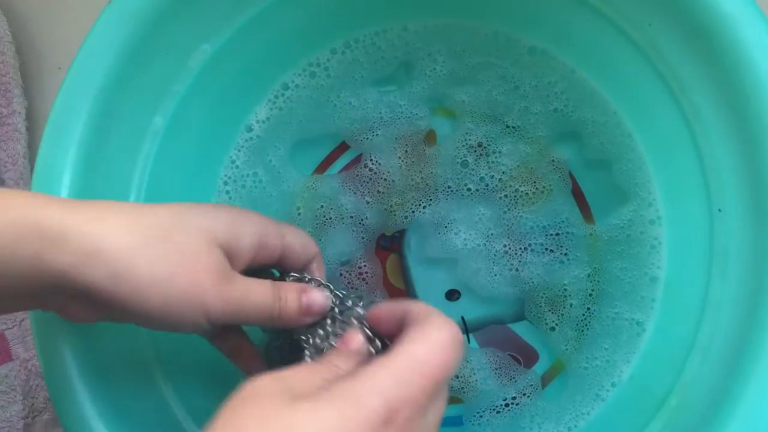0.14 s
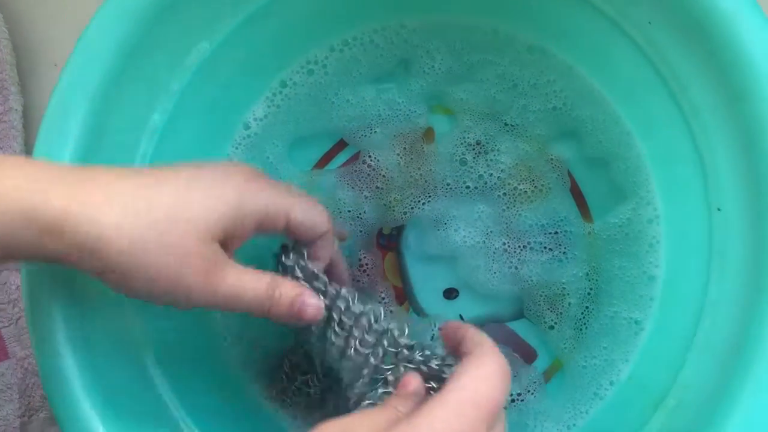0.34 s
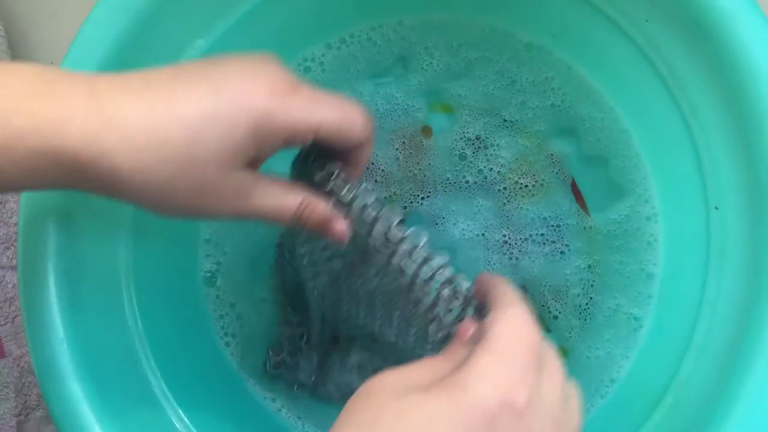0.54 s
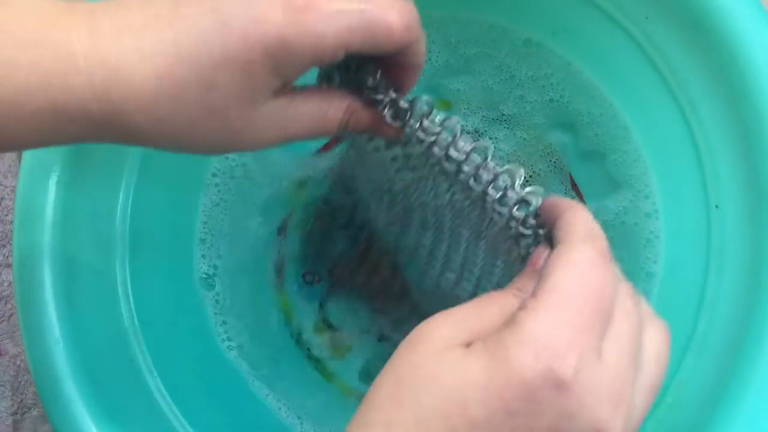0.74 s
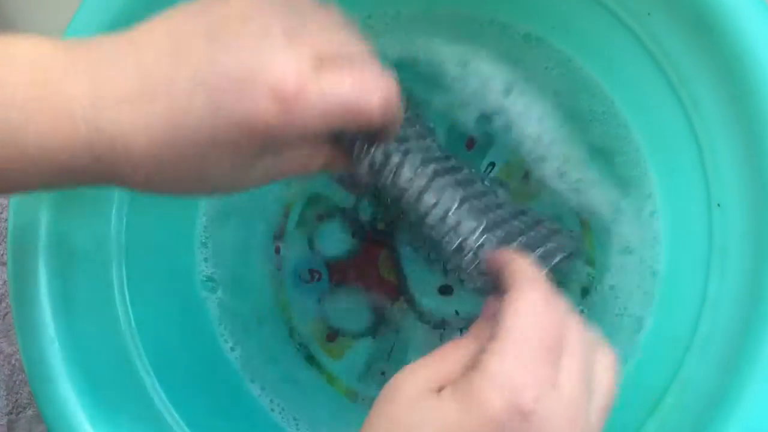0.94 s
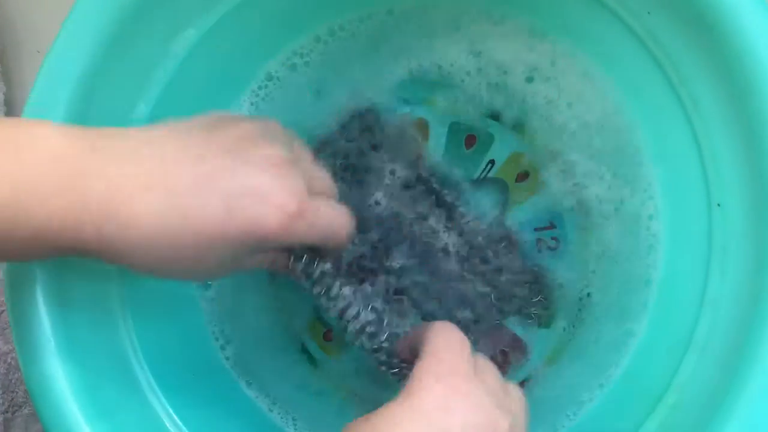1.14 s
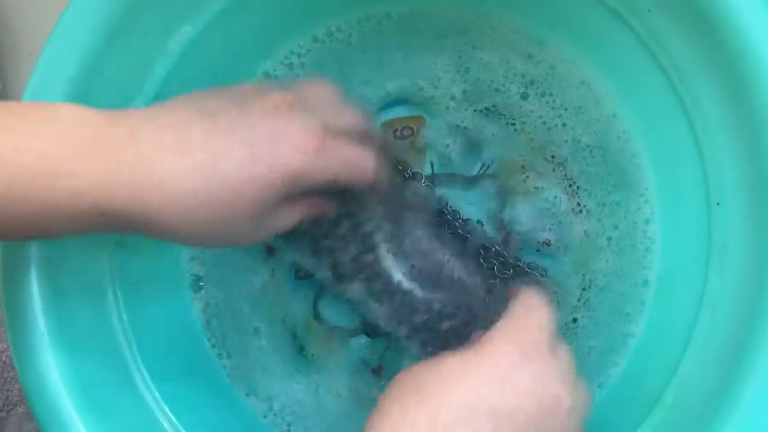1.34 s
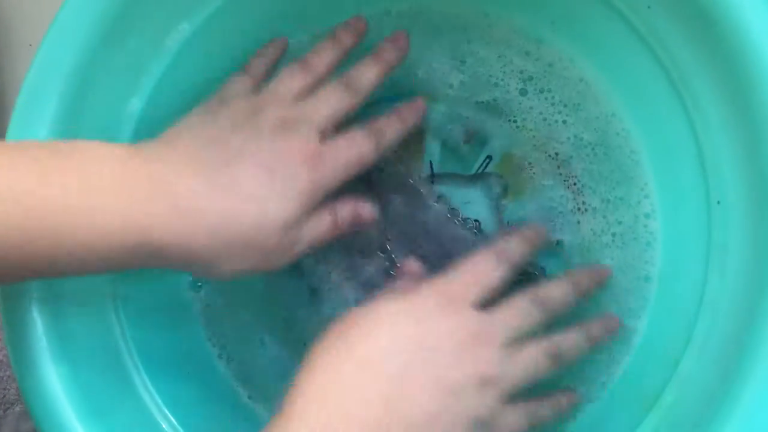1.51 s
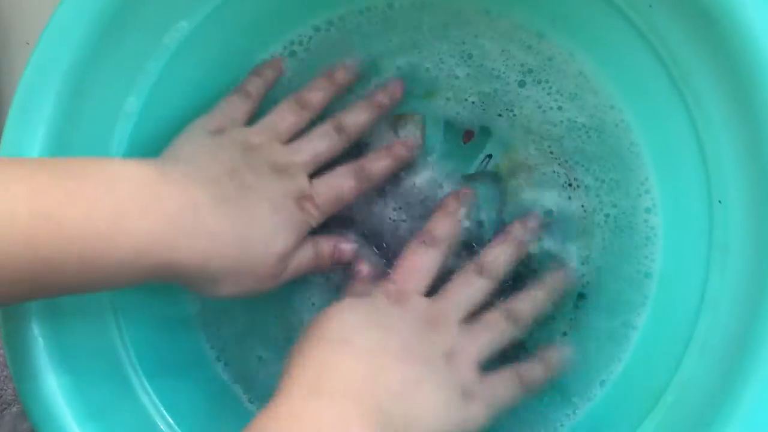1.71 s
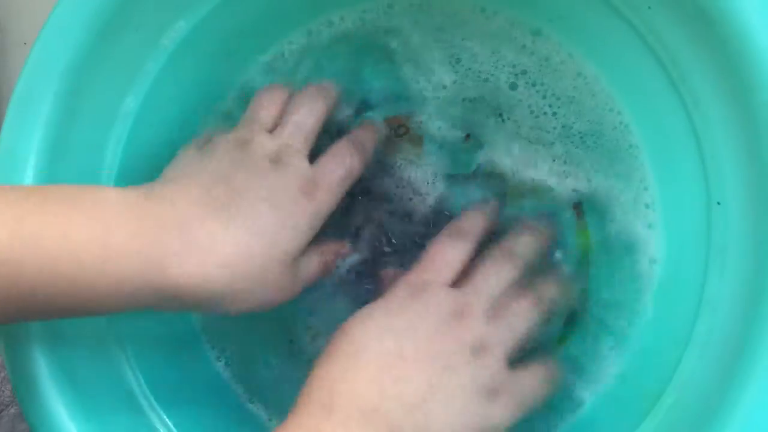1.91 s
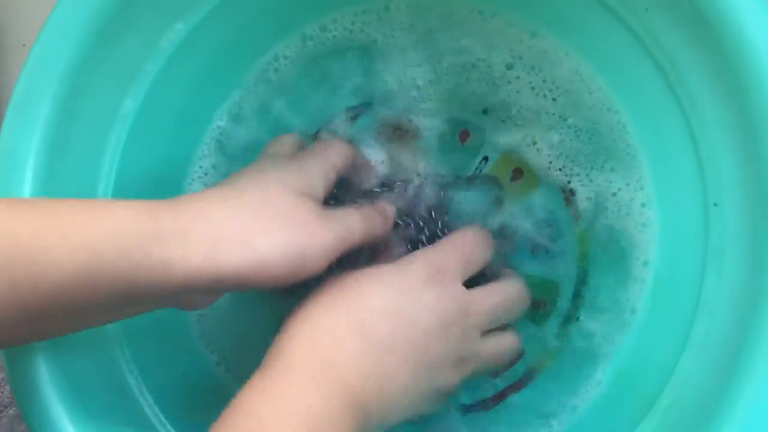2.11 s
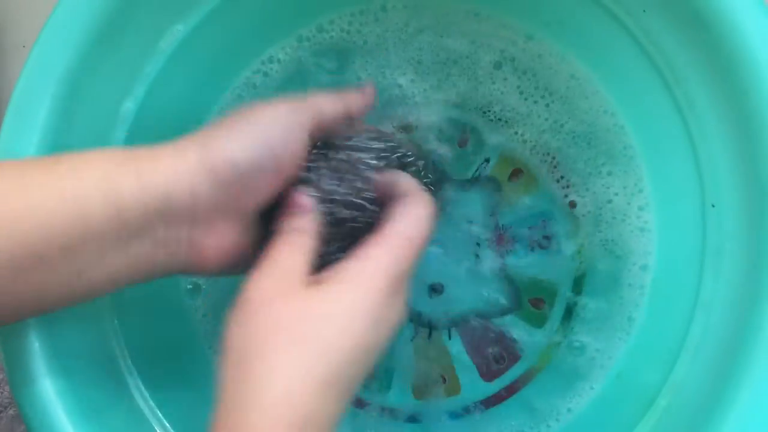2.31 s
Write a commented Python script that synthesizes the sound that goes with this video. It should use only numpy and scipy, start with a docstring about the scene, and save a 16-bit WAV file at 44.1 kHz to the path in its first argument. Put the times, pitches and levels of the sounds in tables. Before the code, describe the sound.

A sheet of chainmail drops with a clattering crash into a plastic basin and is rubbed in soapy water

```python
"""Chainmail in a washing-up basin

A sheet of chainmail jingles, drops into a plastic basin of soapy water and is rubbed by two hands.
Random contacts and short knocks drive the basin wall; brighter contacts are rings ticking on rings.
Decaying sines chime; filtered noise makes the slosh, the rumble on the floor and the hiss.
A small room adds a short tail; the sheet jingles again when lifted out."""
import sys
import numpy as np
from scipy import signal
from scipy.fft import rfft, irfft
from scipy.io import wavfile

SR = 44100
rng = np.random.default_rng(int(sys.argv[2]) if len(sys.argv) > 2 else 0)


def gain_from_decibels(decibels):
    """Convert decibel values to linear amplitude factors."""
    exponent = np.asarray(decibels, float) / 20
    return 10 ** exponent


def to_wav(sig):
    """Store sig (one row per channel, or 1-D mono) as 16-bit WAV at the path in sys.argv[1].

    Samples outside -1..1 are clipped; the rate is SR.
    """
    pcm = np.clip(np.atleast_2d(sig), -1, 1) * 32767
    pcm = np.round(pcm).astype(np.int16)
    wavfile.write(sys.argv[1], SR, pcm.T)  # frames by channels


N = 103635


def evened(x):
    """Scales to rms 1."""
    return x / np.sqrt(np.mean(x ** 2) + 1e-20)


def read(points, hz):
    """Interpolates (frequency, value) points on a log frequency axis."""
    f, value = np.transpose(points)
    return np.interp(np.log(hz + 1), np.log(f + 1), value)


def level(curve):
    """Gain over time from (s, dB) points; -120 dB before the first."""
    s, db = np.transpose(curve)
    return gain_from_decibels(np.interp(np.arange(N) / SR, s, db, left=-120))


def hiss(spectrum):
    """Steady noise of rms 1 with a spectrum."""
    hz = np.fft.rfftfreq(N, 1 / SR)
    shaped = rfft(rng.standard_normal(N)) * gain_from_decibels(read(spectrum, hz))
    return evened(irfft(shaped, N))


def clicks(per_s, spread_db):
    """Random contacts of either sign, a few of them large; rms 1 overall."""
    hit = rng.random(N) < per_s / SR
    size = gain_from_decibels(spread_db * np.minimum(rng.exponential(1, N), 4))
    sign = rng.choice([-1., 1.], N)
    return evened(hit * sign * size)


def body(spectrum, modes, modes_db, size=8192):
    """Minimum-phase response of unit energy to one blow: a broad colour with modes standing on it."""
    hz = abs(np.fft.fftfreq(size, 1 / SR))
    power = gain_from_decibels(np.maximum(read(spectrum, hz), -100)) ** 2
    for f, db, t60 in modes:
        detune = (hz - f) * t60 / 1.1  # in half bandwidths
        power += gain_from_decibels(db + modes_db) ** 2 / (1 + detune ** 2) ** 2
    log_gain = np.log(power) / 2
    phase = -signal.hilbert(log_gain).imag
    h = np.fft.ifft(np.exp(log_gain + 1j * phase)).real[:size // 2]
    return h / np.linalg.norm(h)


def air():
    """Room and microphone hiss: steady coloured noise."""
    # (frequency [Hz], relative level [dB])
    air_colour = [(15, -48), (25, -9), (248, -8.5), (316, -13), (557, -10.5), (691, -16), (2260, -12),
                  (7630, -26), (14600, -30), (15800, -21)]
    air_db = -70
    return gain_from_decibels(air_db) * hiss(air_colour)


def jingle():
    """Dry rings ticking, the sheet free in the air before the drop and when lifted out."""
    # sheet motion: (time [s], level [dB])
    jingle_curve = [(0, -76), (.05, -61.5), (.11, -58), (.14, -48.5), (.2, -54), (.23, -58), (.3, -83),
                    (2, -88), (2.15, -51), (2.27, -50.5), (2.35, -54)]
    # colour of dry rings: (frequency [Hz], relative level [dB])
    dry_colour = [(180, -71), (300, -54), (958, -35), (1270, -35), (2090, -19), (4480, -19), (6450, -19),
                  (7130, -20), (10300, -19.5), (11300, -11.5), (15800, -20)]
    # ring modes: (frequency [Hz], level before links_db [dB], nominal t60 [s])
    links = [(11450, 1, .008), (12000, -3, .006)]
    links_db = -6
    force = level(jingle_curve) * clicks(per_s=8000, spread_db=3.9)
    return signal.oaconvolve(force, body(dry_colour, links, links_db))[:N]


def rumble():
    """Basin rocking on the floor: low noise that rises and falls."""
    # rocking: (time [s], level [dB])
    rumble_curve = [(0.0, -81), (0.04, -74), (0.09, -78), (0.13, -69), (0.21, -82), (0.24, -62),
                    (0.26, -48.5), (0.49, -75.5), (0.67, -62.5), (0.72, -65), (1.0, -67), (1.2, -66),
                    (1.3, -65), (1.34, -72), (1.38, -64), (1.43, -75), (1.47, -51), (1.67, -82),
                    (1.71, -58.5), (1.79, -74), (1.86, -51), (1.96, -59.5), (1.98, -52), (2.02, -66),
                    (2.05, -52.5), (2.18, -52.5), (2.32, -71), (2.35, -76)]
    # colour: (frequency [Hz], relative level [dB])
    low_colour = [(15, -40), (40, -8), (65, 2.5), (95, 14.5), (115, 4.5), (140, 13), (170, -16), (230, -42),
                  (500, -90)]
    return level(rumble_curve) * hiss(low_colour)


def slosh():
    """Water pushed by the hands: noise with a watery colour that rises and falls."""
    # water motion: (time [s], level [dB])
    slosh_curve = [(0.0, -76), (0.2, -86), (0.24, -53.5), (0.43, -77), (0.76, -64.5), (0.82, -79),
                   (0.89, -64), (0.95, -67.5), (1.01, -63), (1.13, -77), (1.16, -56.5), (1.44, -73),
                   (1.48, -50.5), (1.53, -78), (1.65, -88), (1.73, -51), (1.79, -72), (1.86, -50.5),
                   (2.01, -68), (2.03, -57), (2.12, -49), (2.35, -66.5)]
    # colour: (frequency [Hz], relative level [dB])
    water_colour = [(110, -45), (170, -1.5), (220, -4.5), (280, -7), (400, -11), (600, -6.5), (1000, -30),
                    (2000, -70)]
    return level(slosh_curve) * hiss(water_colour)


def bump():
    """A soft bump on the floor: a low sine under a smooth window."""
    # (time [s], peak level [dB], pitch [Hz])
    thumps = [(0.109, -53.5, 69.5)]
    bump_s = 0.057
    out, t = np.zeros(N), np.arange(0, bump_s, 1 / SR)
    for s, db, hz in thumps:
        start = round(s * SR)
        out[start:start + len(t)] += gain_from_decibels(db) * np.hanning(len(t)) * np.sin(2 * np.pi * hz * t)
    return out


def chimes():
    """Single rings that chime: sines with a quick onset and exponential decay."""
    # (time [s], level [dB], pitch [Hz])
    chime_list = [(.160, -42, 11450), (.192, -42, 6300), (.204, -40, 5200), (.272, -25, 5250),
                  (.390, -33, 4450), (.408, -33, 4450), (.659, -30, 6180), (.740, -37, 6250)]
    t60_s, onset_s = 0.018, 0.0006
    out, t = np.zeros(N), np.arange(2500) / SR
    for s, db, hz in chime_list:
        start = round(s * SR)
        envelope = np.minimum(t / onset_s, 1) * gain_from_decibels(db - 60 * t / t60_s)
        out[start:start + len(t)] += envelope * np.sin(2 * np.pi * hz * t)
    return out


def knock_force(column):
    """Short clusters of rings meeting the wall: noise bursts at the level in one column."""
    # (time [s], wall level [dB], tick level [dB], cluster decay [s])
    knocks = [(0.217, -12, -30, 0.0064), (0.227, -8.5, -34, 0.005), (0.237, 3.5, -39, 0.0015),
              (0.237, -9, -36, 0.0028), (0.242, 4, -17, 0.0013), (0.246, -11.5, -23, 0.0037),
              (0.388, -25, -50, 0.0043), (0.409, -24, -47, 0.0023), (0.445, -26.5, -52, 0.0055),
              (0.463, -27, -47, 0.0043), (0.498, -22, -44, 0.0033), (0.547, -49, -42, 0.0059),
              (0.671, -36, -51, 0.0058), (0.748, -20, -42, 0.007), (0.792, -29, -34.5, 0.0033),
              (0.826, -26, -36.5, 0.0024), (0.84, -15, -37, 0.009), (0.856, -25, -31.5, 0.005),
              (0.92, -24, -43.5, 0.0096), (0.973, -14, -57, 0.0048), (1.01, -16, -46, 0.0016),
              (1.036, -11, -28, 0.0036), (1.161, -16, -46, 0.0074), (1.215, -28, -41.5, 0.007),
              (1.351, -32.5, -46, 0.0043), (1.364, -39, -41.5, 0.0056), (1.389, -25.5, -41, 0.0083),
              (1.42, -23, -41, 0.004), (1.442, -34, -36, 0.0032), (1.462, -20.5, -37, 0.006),
              (1.485, -12.5, -33, 0.0031), (1.492, -30, -30, 0.0038), (1.683, -27.5, -47, 0.004),
              (1.704, -14.5, -36, 0.0046), (1.711, -15.5, -43, 0.0017), (1.808, -41, -45, 0.0044),
              (1.843, -19, -34, 0.0038), (1.989, -24.5, -40, 0.002), (2.039, -20, -42, 0.0056),
              (2.113, -17.5, -40, 0.012)]
    force, t = np.zeros(N), np.arange(1024) / SR
    for row in knocks:
        start = round(row[0] * SR)
        burst = rng.standard_normal(len(t)) * np.exp(-(t / row[3]) ** 2)
        force[start:start + len(t)] += gain_from_decibels(row[column]) * burst
    return force


def ring_ticks():
    """Dense contacts of wet ring on ring, and those of the knocks, coloured by the rings."""
    # rings moving against each other: (time [s], level before rustle_db [dB])
    rustle_curve = [(0.2, -66), (0.21, -59), (0.214, -49), (0.242, -24), (0.342, -53), (0.438, -64),
                    (0.444, -51), (0.482, -63), (0.5, -47), (0.506, -53.5), (0.624, -52), (0.672, -46),
                    (0.688, -62), (0.714, -44.5), (0.852, -51.5), (0.858, -36), (0.886, -56), (0.91, -62),
                    (0.924, -44.5), (0.966, -46.5), (0.972, -32), (1.064, -43), (1.096, -50), (1.144, -54),
                    (1.164, -39), (1.208, -52.5), (1.214, -48), (1.25, -56), (1.26, -53), (1.284, -62),
                    (1.31, -78), (1.338, -91), (1.368, -52), (1.38, -62), (1.39, -42.5), (1.432, -51.5),
                    (1.466, -32), (1.502, -39), (1.512, -67), (1.59, -87), (1.674, -72), (1.682, -57),
                    (1.69, -43), (1.708, -38.5), (1.73, -44), (1.776, -66), (1.848, -39), (1.882, -35),
                    (1.918, -55), (1.946, -39.5), (1.982, -51), (1.988, -44), (1.996, -51.5), (2.042, -40),
                    (2.096, -39.5), (2.128, -42), (2.172, -33), (2.218, -49.5), (2.346, -30.5), (2.35, -50)]
    # colour of ring on ring: (frequency [Hz], relative level [dB])
    tick_colour = [(300, -25), (1500, -27.5), (2500, -5.5), (4000, -2), (6400, -6), (7200, -10.5),
                   (9800, -11.5), (10350, -18), (10800, -11), (11600, -13.5), (13000, -15.5), (15800, -17)]
    rustle_db = -0.5
    rustle = gain_from_decibels(rustle_db) * level(rustle_curve) * clicks(per_s=5200, spread_db=3.5)
    force = rustle + knock_force(column=2)
    return signal.oaconvolve(force, body(tick_colour, [], 0))[:N]


def basin():
    """A hail of small blows and some forty short knocks, from faint to hard, ring the wall modes."""
    # force of the rings on the basin: (time [s], level before scrape_db [dB])
    scrape_curve = [(0.2, -81), (0.204, -99), (0.214, -49), (0.238, -18.5), (0.284, -37), (0.296, -31.5),
                    (0.334, -42), (0.424, -48), (0.506, -44), (0.514, -44), (0.836, -33.5), (0.842, -33),
                    (0.884, -40), (1.006, -28.5), (1.012, -27.5), (1.076, -31), (1.096, -44),
                    (1.156, -38.5), (1.168, -48), (1.202, -37.5), (1.25, -41), (1.26, -38), (1.268, -38),
                    (1.344, -50), (1.384, -46.5), (1.396, -37), (1.414, -44), (1.422, -37), (1.438, -42.5),
                    (1.468, -29.5), (1.496, -30), (1.512, -51.5), (1.644, -62.5), (1.662, -86),
                    (1.688, -37.5), (1.706, -29), (1.72, -26), (1.754, -56), (1.806, -46.5), (1.848, -34),
                    (1.878, -28), (1.926, -48.5), (1.94, -33), (2.024, -41), (2.054, -29), (2.088, -36.5),
                    (2.17, -27.5), (2.204, -36.5), (2.27, -34), (2.282, -41.5), (2.35, -42)]
    # broad colour of one blow: (frequency [Hz], relative level [dB])
    thud_colour = [(150, -36), (260, -41), (350, -12.5), (540, -12.5), (740, -4.5), (1050, -6.5),
                   (1700, -2.5), (2100, -4), (2500, -9.5), (3400, -10), (4500, -17.5), (6500, -20.5),
                   (7500, -29), (15500, -34)]
    # wall modes: (frequency [Hz], level before modes_db [dB], nominal t60 [s])
    wall_modes = [(357, -17, .1), (748, -8, .05), (875, -9, .05), (1217, -6, .08), (1430, -9, .05),
                  (1601, 0, .055), (1717, 1, .055), (1960, 0, .045), (2100, -2, .05), (2200, -9, .05),
                  (2935, -12, .05), (3199, -8, .08), (3400, -11, .04), (3780, -13, .04)]
    scrape_db, knock_db, modes_db = -1.5, -10.5, 3
    knock_low_hz = 744  # knocks are light and stir little bass
    b, a = signal.butter(2, knock_low_hz, "high", fs=SR)
    light = signal.lfilter(b, a, knock_force(column=1))
    scrape = gain_from_decibels(scrape_db) * level(scrape_curve) * clicks(per_s=3000, spread_db=3)
    force = scrape + gain_from_decibels(knock_db) * light
    return signal.oaconvolve(force, body(thud_colour, wall_modes, modes_db))[:N]


def room(x):
    """Three sparse tails fed in rotation at a fixed rate, so no one comb colours the room; t60 by band."""
    # (frequency [Hz], t60 [s])
    room_t60 = [(200, 0.47), (1000, 0.26), (3000, 0.19), (8000, 0.22), (15000, 0.13)]
    turn_hz, spacing = 7, 12  # spacing in samples
    out, at = np.zeros(N), np.arange(200, SR // 2 - 20, spacing)
    for k in range(3):
        taps = np.zeros(SR // 2)
        taps[at + rng.integers(0, spacing, len(at))] = rng.choice([-1., 1.], len(at))
        hz, t, z = signal.stft(taps, SR, nperseg=256)
        decay = gain_from_decibels(-60 * t / read(room_t60, hz)[:, None])
        tail = signal.istft(z * decay, SR, nperseg=256)[1]
        turns = turn_hz * np.arange(N) / SR + k / 3
        share = np.sqrt(2 / 3) * np.cos(2 * np.pi * turns)  # summed power stays constant
        out += signal.fftconvolve(x * share, tail / np.linalg.norm(tail))[:N]
    return out


def scene():
    """Basin and rings in the room, over low water and floor sounds and hiss."""
    room_db = -8.5
    near = jingle() + chimes() + ring_ticks() + basin()
    low = rumble() + slosh() + bump()
    return (near + gain_from_decibels(room_db) * room(near) + low + air())[None]


def low_pass(x):
    """Removes everything above the highest recorded frequency."""
    return signal.sosfilt(signal.butter(12, 17010, fs=SR, output="sos"), x)


def record(dry):
    """Microphone bass cut, then a steep treble limit."""
    mic_low_hz, edge_hz = 70, 15900
    bass_cut = signal.butter(2, mic_low_hz, "high", fs=SR, output="sos")
    limit = signal.firwin(511, edge_hz, window=("kaiser", 6), fs=SR)
    mix = signal.sosfilt(bass_cut, dry)
    mix = signal.oaconvolve(mix, limit[None], "same")
    return low_pass(mix)


dry = scene()
out = record(dry)
to_wav(out)
```